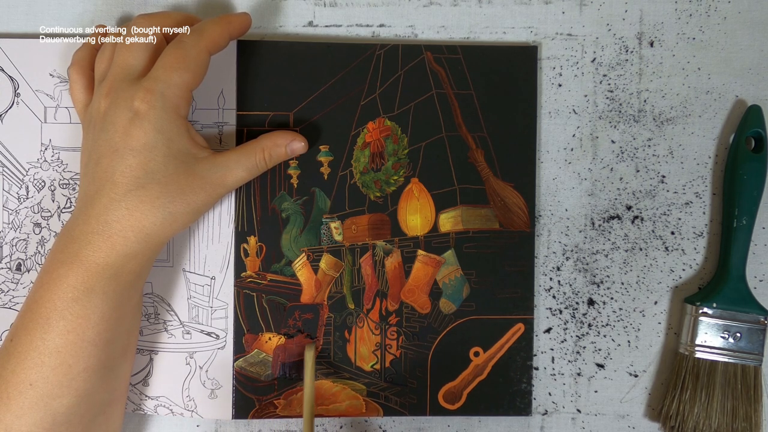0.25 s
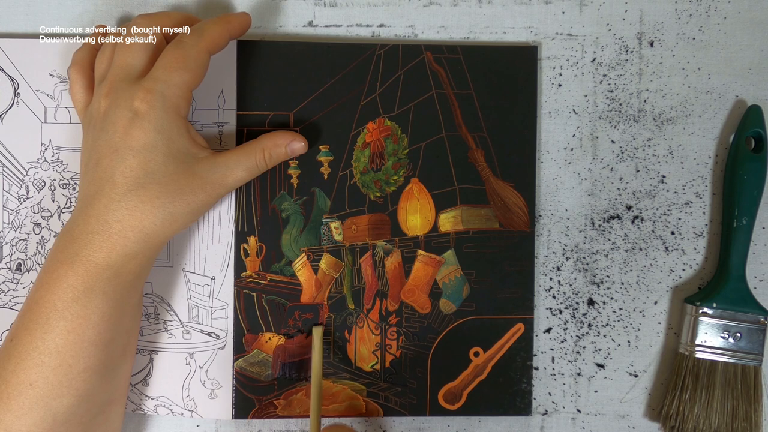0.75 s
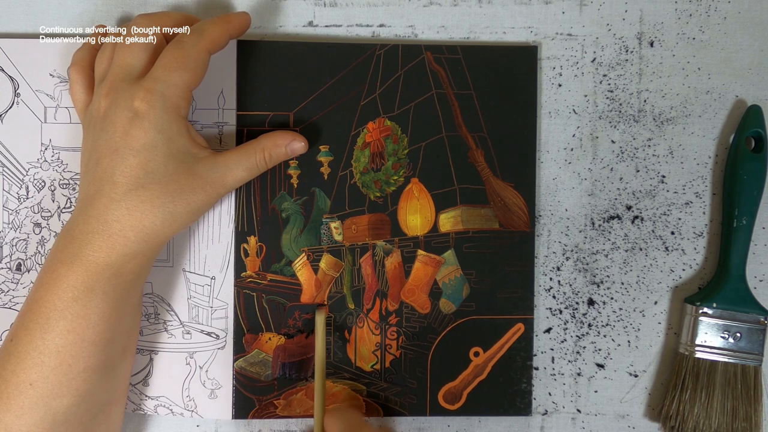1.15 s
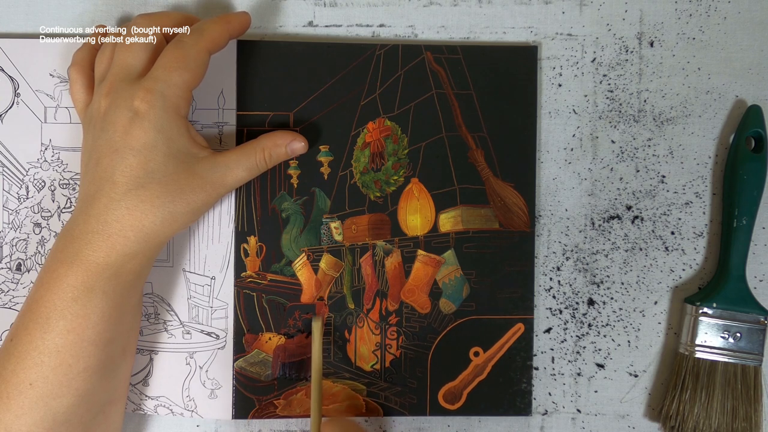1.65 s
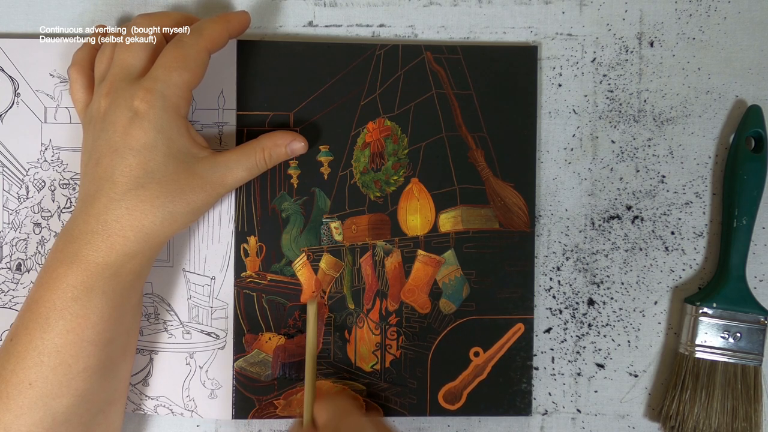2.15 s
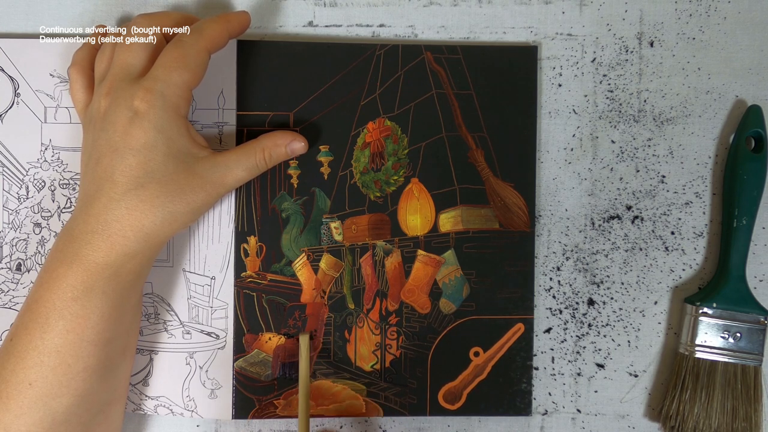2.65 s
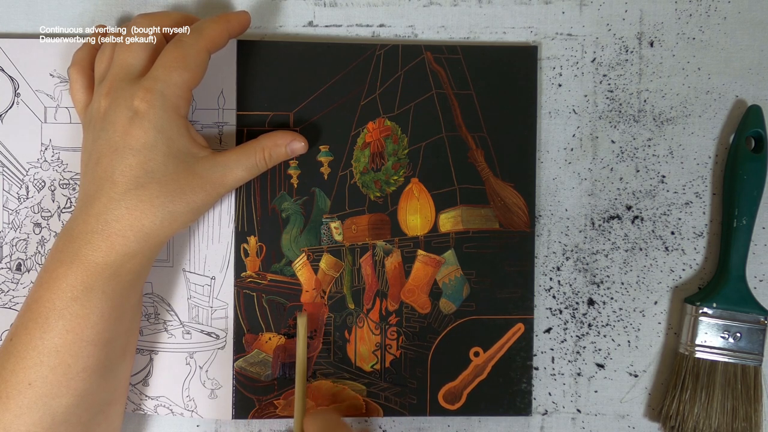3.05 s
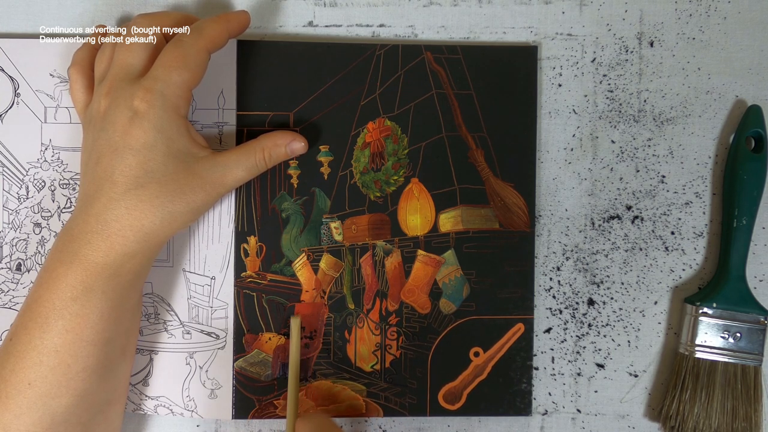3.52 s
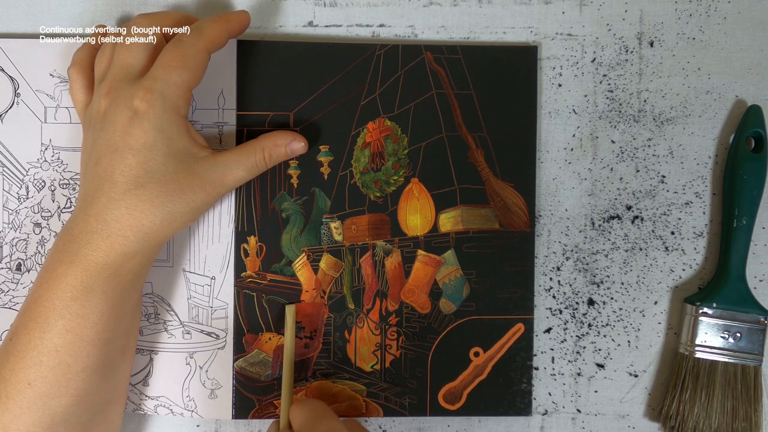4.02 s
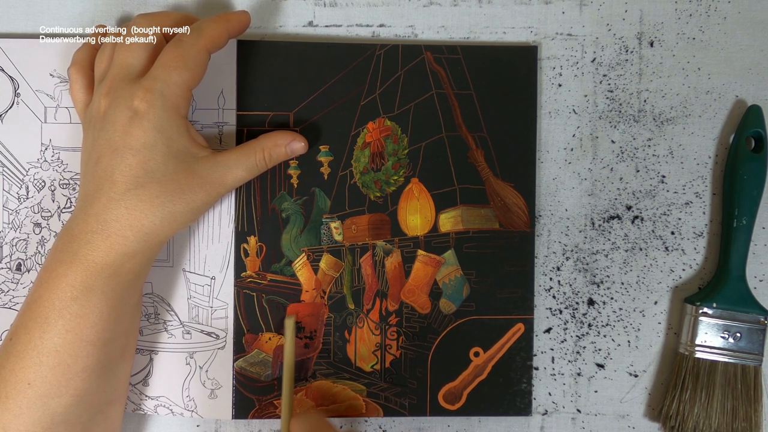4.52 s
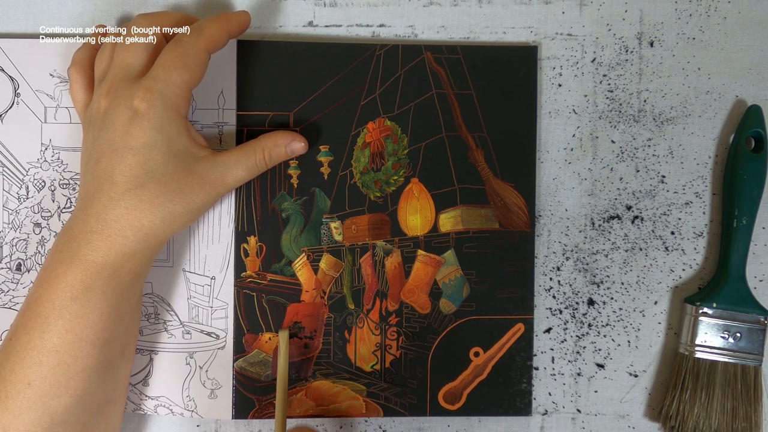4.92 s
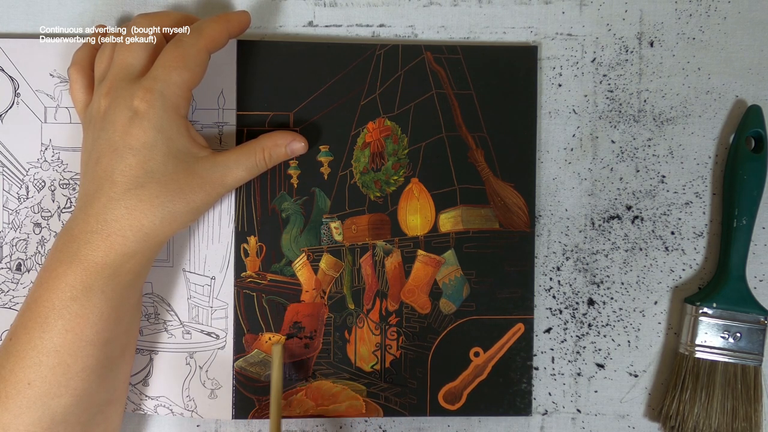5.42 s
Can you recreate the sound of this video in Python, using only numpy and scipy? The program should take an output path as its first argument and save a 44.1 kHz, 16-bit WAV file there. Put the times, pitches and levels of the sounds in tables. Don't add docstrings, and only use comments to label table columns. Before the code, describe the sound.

A wooden stylus scratches coated card on a table, heard close in a small quiet room. It opens mid-stroke with a hard push, catch and bump, then short uneven back-and-forth scrapes follow, several per second. Woody chatter, crisp flakes and dull table knocks colour them; later strokes turn dustier and lighter. A close stereo microphone also picks up slight low rumble and steady soft hiss.

```python
import sys
import numpy as np
from scipy import signal
from scipy.fft import rfft, irfft, next_fast_len
from scipy.io import wavfile
from scipy.ndimage import map_coordinates

SR = 44100
rng = np.random.default_rng(int(sys.argv[2]) if len(sys.argv) > 2 else 0)


def log_audio(samples):
    frames = np.atleast_2d(samples).T
    limited = np.clip(frames, -1, 1)
    pcm = np.round(limited * 32767).astype(np.int16)
    wavfile.write(sys.argv[1], SR, pcm)


def elevation(decibels):
    levels = np.asarray(decibels, float)
    return 10 ** (levels / 20)


N = 250047


def unit(x):
    return x / np.sqrt(np.mean(x ** 2) + 1e-20)


def along(points, hz):
    f, v = np.transpose(points)
    return np.interp(np.log(hz + 1), np.log(f + 1), v)


def over_time(points):
    return np.interp(np.arange(N) / SR, *np.transpose(points))


def wobble(knots_per_s):
    knots = rng.standard_normal(int(N * 400 / SR))
    return map_coordinates(knots, [np.arange(N) * knots_per_s / SR])


def filtered(x, response):
    m = next_fast_len(N + SR // 2)
    return irfft(rfft(x, m) * response(np.fft.rfftfreq(m, 1 / SR)), m)[..., :N]


def body(modes):
    def ring(f):
        total = 0
        for k, (hz, width_hz, db) in enumerate(modes):
            damping = 1j * f * width_hz
            total = total + (-1) ** k * elevation(db) * damping / (hz * hz - f * f + damping)
        return total
    return lambda f: ring(f) / np.sqrt(np.mean(np.abs(ring(f)) ** 2))


def skirted(modes, power):
    return lambda f: unit(np.abs(body(modes)(f)) ** power)


def colour(spectrum):
    return lambda f: unit(elevation(along(spectrum, f)))


# (time [s], run-out [s], pad level [dB], weight on the table [dB], tip speed [dB])
PUSHES = [(-0.035, 0.051, -39.5, -2, -2), (0.52, 0.042, -54, 6.5, 8.5), (0.734, 0.039, -41, 0.5, 0),
          (1.079, 0.077, -36.5, -6, -1.5), (1.905, 0.086, -45, -2.5, -2), (2.078, 0.067, -52, -11, 10),
          (2.244, 0.11, -40, -1.5, 1.5), (2.594, 0.13, -45, -5, 7), (2.772, 0.02, -38.5, -41, -0.5),
          (2.817, 0.0062, -43.5, -20, 1.5), (2.96, 0.1, -43.5, -5.5, 4), (3.098, 0.037, -48, -12, -2),
          (3.148, 0.015, -34.5, -3, -10), (3.17, 0.016, -42, -9.5, -1), (3.448, 0.02, -43.5, -29, -5.5),
          (3.537, 0.098, -44, -0.5, -5.5), (3.728, 0.036, -38.5, -29, -10.5), (4.117, 0.1, -57, 14.5, -2.5),
          (4.146, 0.085, -43, -31, -5), (4.472, 0.047, -45.5, -4.5, -7), (4.86, 0.069, -46.5, -18, -5),
          (4.98, 0.06, -65, 19.5, -6), (5.061, 0.026, -40, -25, -21), (5.527, 0.095, -42.5, -19, -9)]
# (time [s], build-up [s], pad level [dB], weight on the table [dB], tip speed [dB])
PULLS = [(0.054, 0.13, -54.5, -11, 1.5), (0.11, 0.054, -46, -13, -1.5), (0.24, 0.12, -36.5, -4, -1.5),
         (0.597, 0.1, -58, 1, 5), (0.706, 0.017, -48.5, 4.5, 9.5), (0.838, 0.042, -46, -10.5, -2.5),
         (1.413, 0.059, -37.5, -25, -5), (2.012, 0.042, -63, 5, 4.5), (2.064, 0.013, -51.5, -2, 13.5),
         (2.39, 0.068, -38, -10.5, 0.5), (2.715, 0.13, -51.5, -6, 6), (3.031, 0.091, -67.5, 20.5, -6),
         (3.229, 0.088, -41, -0.5, -2.5), (3.659, 0.11, -53, -4.5, -5.5), (3.822, 0.074, -44.5, -1, -3),
         (4.407, 0.063, -51, -1, -0.5), (4.988, 0.05, -43.5, -13, -2.5), (5.295, 0.074, -42, -32, -7.5)]
# (time [s], length [s], pad level [dB], weight on the table [dB], tip speed [dB])
GLIDES = [(0.34, 0.32, -66, 3, 0), (0.821, 0.17, -66, 0, 8), (0.984, 0.17, -58, 3, 3.5),
          (1.18, 0.16, -58, -15, -1.5), (1.344, 0.2, -54, 6.5, -0.5), (1.549, 0.13, -40, -9.5, -2),
          (1.689, 0.16, -56, -4, 2), (1.86, 0.17, -66, 3, 11), (2.137, 0.2, -70.5, -18, 7),
          (2.353, 0.25, -71.5, 9, 16.5), (2.502, 0.31, -57.5, -2, -1.5), (2.828, 0.15, -63, -20, -4),
          (2.894, 0.23, -79, 5, 15), (3.374, 0.19, -57.5, -0.5, -4.5), (3.536, 0.14, -55.5, -7, 6),
          (3.819, 0.17, -64, -3, 11), (3.964, .14, -58.5, -2, -5.5), (4.243, 0.16, -58.5, -4, -6),
          (4.532, 0.18, -59.5, -6, -5), (4.765, 0.19, -46, 3, -6), (5.029, 0.13, -64, 14.5, 9),
          (5.21, 0.15, -65, -0.5, -4.5), (5.368, 0.094, -64.5, -2, 7), (5.479, 0.2, -59.5, -2.5, 0.5)]
DIG_S, LET_GO_S, LET_GO_SHARE, GLIDE_RISE_SHARE = 0.025, 0.016, 0.2, 0.45
PULL_SCRATCH_DB, GLIDE_SCRATCH_DB = -2, 2


def strokes():
    rows = [(s, DIG_S, run_out, *db, 0) for s, run_out, *db in PUSHES]
    for s, build, *db in PULLS:
        rows.append((s, build, LET_GO_S + LET_GO_SHARE * build, *db, PULL_SCRATCH_DB))
    for s, length, *db in GLIDES:
        rise = GLIDE_RISE_SHARE * length
        rows.append((s, rise, length - rise, *db, GLIDE_SCRATCH_DB))
    return np.transpose(rows)


def swell(level_db, lag=0, tilt_db=0, edge=2):
    power = np.zeros(N)
    for s, rise, fall, db in zip(*strokes()[:3], level_db):
        start = s + lag
        at = np.arange(max(round(start * SR), 0), min(round((start + rise + fall) * SR), N))
        t = at / SR - start
        up = np.clip(t / rise, 0, 1)
        down = np.clip((t - rise) / fall, 0, 1)
        shape = (np.sin(up * np.pi / 2) * np.cos(down * np.pi / 2)).clip(0) ** edge
        power[at] += (elevation(db + tilt_db * t / (rise + fall)) * shape) ** 2
    return np.sqrt(power)


def slips(share, spread_db, clump_db):
    size = elevation(spread_db * rng.exponential(size=N).clip(0, 5)) * (rng.random(N) < share)
    return unit((size + 0.43) * rng.standard_normal(N) * elevation(clump_db * wobble(90)))


# (time [s], dust gain [dB], thud gain [dB], scratch gain [dB])
BARE = [
    (0.1, 4, 11, 8.5),
    (0.9, 2, -3, -1),
    (1.05, 6.5, 11, 0.5),
    (1.9, 4, 18.5, -0.5),
    (2.3, 12, -1, 0.5),
    (2.9, 12, 2.5, -2),
    (3.499, 6, 19.5, -1.5),
    (4.2, 21, 24, 3),
    (5.1, 19, 18, -0.1),
    (5.4, 6, 25, 1),
]


def bare(s):
    at, *gains_db = np.transpose(BARE)
    return [np.interp(s, at, db) for db in gains_db]


def bursts(rows, rise_s, fall_s, sink_per_s=5.4, rough_db=0):
    out, t = np.zeros(N + SR), np.arange(-SR // 40, SR // 12) / SR
    shape = np.where(t < 0, np.exp(-(t / rise_s) ** 2), 1 / np.cosh(t / fall_s))
    for (s, db, hz), turn in zip(rows, rng.random(len(rows))):
        cycles = hz * t * (1 - sink_per_s * t / 2) + turn
        out[round(s * SR):][:len(t)] += elevation(db) * shape * np.sin(2 * np.pi * cycles)
    return out[SR // 40:][:N] * elevation(rough_db * wobble(180))


# (time [s], peak level [dB], pitch [Hz])
SHOVES = [(0.0025, -45, 314), (0.0384, -45.5, 330), (0.3881, -33, 338), (0.43, -41.5, 321),
          (0.5607, -48.5, 465), (0.7867, -54, 353), (0.874, -39.5, 467), (1.1454, -41.5, 349),
          (1.4707, -42, 400), (1.969, -46.5, 353), (2.3192, -37, 358), (2.4609, -46.5, 355),
          (3.0141, -47.5, 395), (3.0451, -43, 345), (3.1843, -49, 372), (3.3254, -39.5, 414),
          (3.5714, -40.5, 400), (3.6088, -48, 368), (3.7605, -42.5, 410), (3.8622, -42.5, 460),
          (3.8807, -39.5, 410), (3.9111, -43, 346), (3.9385, -40, 335), (4.1595, -49, 374),
          (4.2144, -49, 355), (4.4499, -42.5, 483), (4.838, -48, 516), (4.8495, -38, 310),
          (4.8819, -44, 330), (5.0495, -37.5, 322), (5.0929, -43, 310), (5.3848, -45, 491),
          (5.5753, -40, 555)]


def shoves():
    return elevation(-3.5) * bursts(SHOVES, rise_s=0.016, fall_s=0.0086, sink_per_s=1.9, rough_db=4.0)


# (time [s], peak level [dB], pitch [Hz])
FLUTTERS = [(0.0035, -35, 1260), (0.1527, -37, 875), (0.1661, -45.5, 1260), (0.2903, -35, 1155),
            (0.3068, -35, 810), (0.3233, -53, 1270), (0.3592, -36, 1080), (0.3622, -41, 860),
            (0.3751, -31, 1184), (0.3816, -33, 1195), (0.5358, -49, 1230), (1.1299, -45, 1200),
            (1.4692, -39, 1250), (1.5704, -40, 1290), (1.5884, -44, 1230), (1.6078, -38, 1274),
            (1.6308, -38.5, 1260), (1.776, -48, 1010), (1.9341, -40.5, 1220), (1.9501, -42, 1260),
            (2.1032, -34, 797), (2.2798, -41, 1245), (2.2968, -44, 1260), (2.3073, -40, 1120),
            (2.3247, -47, 1044), (2.6066, -31.5, 1274), (2.649, -27.5, 973), (2.7887, -32.5, 900),
            (2.8301, -36, 1010), (2.9822, -31.5, 1110), (2.9862, -31, 860), (2.9942, -40, 1290),
            (3.0067, -47, 1130), (3.0266, -35, 800), (3.1593, -37, 1130), (3.1733, -38, 1210),
            (3.2915, -43, 1120), (3.6123, -42.5, 1270), (3.776, -39, 1293), (3.8752, -38, 900),
            (4.1765, -42, 1320), (5.5514, -40, 1176)]


def flutters():
    return elevation(-2.5) * bursts(FLUTTERS, rise_s=0.003, fall_s=0.0038)


# (time [s], peak level [dB], pitch [Hz])
CHATTERS = [(0.0055, -27, 738), (0.2978, -30.5, 705), (0.3337, -33, 780), (0.3402, -37, 1145),
            (0.3462, -26.5, 663), (0.3781, -30.5, 660), (0.7154, -34, 1207), (0.7568, -32, 726),
            (0.7698, -30.5, 740), (1.0945, -27.5, 1040), (1.1045, -33, 767), (1.1135, -34, 1210),
            (1.1165, -29.5, 760), (1.4502, -38, 725), (1.4707, -34, 787), (1.5929, -33.5, 655),
            (1.6049, -36, 666), (1.6323, -37.5, 640), (1.9266, -37, 890), (1.9391, -36.5, 724),
            (2.0758, -35.5, 890), (2.0997, -31, 1106), (2.2579, -30.5, 993), (2.2743, -23.5, 696),
            (2.3058, -32, 750), (2.3222, -29, 709), (2.4255, -35.5, 855), (2.4449, -31, 1125),
            (2.4499, -26.5, 769), (2.4639, -30.5, 775), (2.4664, -29.5, 1217), (2.6116, -33, 876),
            (2.623, -31.5, 696), (2.662, -25.5, 777), (2.7981, -26.5, 763), (2.8021, -32.5, 1232),
            (2.8371, -33, 670), (2.9967, -24, 752), (3.1658, -27, 691), (3.1798, -35, 680),
            (3.2835, -35, 597), (3.306, -36.5, 796), (3.4651, -36, 770), (3.4766, -34, 760),
            (3.5923, -36, 690), (3.7545, -30.5, 752), (3.8852, -36.5, 820), (3.9111, -42, 770),
            (4.181, -32, 618), (4.4614, -40.5, 630), (4.4938, -47, 715), (4.8171, -38.5, 623),
            (4.828, -40, 732), (4.8919, -45, 704), (5.0844, -32, 630), (5.3803, -33.5, 724),
            (5.5514, -31.5, 734)]


def chatters():
    return elevation(-2.5) * bursts(CHATTERS, rise_s=0.0048, fall_s=0.0041)


# (time [s], peak level [dB])
LANDINGS = [(0.0045, -24.5), (0.129, -32), (0.262, -20.5), (0.535, -23.5), (0.876, -27), (1.092, -30),
            (1.567, -25.5), (1.923, -36), (2.072, -52), (2.254, -17.5), (2.412, -24), (2.604, -22),
            (2.779, -42), (2.971, -23.5), (3.107, -24), (3.258, -26), (3.462, -32), (3.548, -28),
            (3.752, -27.5), (3.853, -27), (4.131, -30.5), (4.438, -36), (4.791, -41), (4.812, -24),
            (4.995, -36), (5.333, -28.5), (5.545, -27)]
LANDING_THUD_DB, SNAG_THUD_DB = -28.5, -26
CHATTER_TICK_DB = 6.5


def catches():
    push, thud, t = np.zeros(N + SR), np.zeros(N + SR), np.arange(SR // 50) / SR
    rows = [(s, db, LANDING_THUD_DB) for s, db in LANDINGS]
    rows += [(s, db + CHATTER_TICK_DB, SNAG_THUD_DB) for s, db, _ in CHATTERS]
    for s, db, thud_db in rows:
        start = round(s * SR) - 180
        at = slice(start, start + len(t))
        burst = unit(rng.standard_normal(len(t)) * np.exp(-t / 0.002))
        push[at] += elevation(db - 24.0) * burst
        thud[at] += elevation(db + thud_db + bare(s)[1] - 17.5) * burst
    return push[:N], thud[:N]


# (frequency [Hz], width [Hz], level [dB])
TABLE = [(258.5, 5.3, -2.5), (276.5, 4.8, -2), (326.9, 8, 5.5), (400.3, 16, 0.5), (470.2, 28.3, 2.5),
         (572.5, 42, -2)]
# (frequency [Hz], width [Hz], level [dB])
PAD = [(618, 34, -3.5), (663, 42.4, -1), (695.3, 49.5, -2), (732, 38.5, 3.5), (762.6, 64.2, -2),
       (845, 24, -4)]
# (frequency [Hz], width [Hz], level [dB])
STICK = [(915.2, 26.4, 1), (986, 60, -1.5), (1086, 42.6, 0), (1196, 86, 1), (1272.6, 64.3, 3),
         (1328.6, 74.3, -1.5), (1518, 26, -6), (1651, 52, -10.5), (1902, 106, -13.5), (2000, 120, -16)]


def scrape():
    pad_db, weight_db, speed_db = strokes()[3:-1]
    force = slips(share=0.03, spread_db=2.5, clump_db=2.0)
    push, thud = catches()
    pad_gain = swell(pad_db - 2.0, lag=-0.0092, tilt_db=1.0)
    table_gain = swell(pad_db + weight_db - 4.0, lag=0.013, tilt_db=0.5)
    stick_gain = swell(pad_db + speed_db - 2.0, lag=-0.0056)
    pad = filtered(pad_gain * force + push, body(PAD))
    table = filtered(table_gain * force + thud, body(TABLE))
    stick = filtered(stick_gain * force + elevation(-6.0) * push, body(STICK))
    return pad + table + stick + chatters() + shoves() + flutters()


# (time [s], peak level [dB], coarse part against it [dB])
CRACKS = [(0.0044, -61, 12), (0.2646, -57.5, 11), (0.32, -63, 15), (0.362, -59.5, 20), (0.531, -52.5, 3.5),
          (5.5413, -53.5, -4), (0.1467, -56, 4), (3.345, -58, 0), (2.4149, -56, 1), (2.435, -54, 2),
          (2.7851, -70, 3), (2.974, -58, -17), (3.1258, -65, 3), (3.5935, -56, -16), (5.573, -59.5, 10),
          (5.099, -74, 5), (1.221, -76, 4), (0.683, -60.5, 6), (0.712, -57, 6), (0.885, -57.5, 4.5),
          (1.0935, -53, 8.5), (1.4592, -62.5, 13), (1.4796, -51.5, 2.5), (1.566, -63, -5), (2.074, -69, 2),
          (2.0997, -53.5, 9.5), (2.254, -56, -9), (2.2817, -45, -1), (2.4649, -52, 11), (2.6058, -53, -20),
          (2.676, -50, -18), (2.805, -51, 1.5), (2.8433, -52.5, 5), (3.1946, -58, -3), (3.2897, -50, -10),
          (3.7758, -56, 2), (4.8866, -55, 1), (4.994, -70, 3), (5.5507, -59, -3), (5.3585, -63, 1),
          (5.388, -59, -1), (5.376, -63, 1.5), (5.5475, -55, 5.5), (5.5769, -54, 6)]
# (frequency [Hz], density [dB per Hz])
FLAKE = [(1500, -29), (3000, -25), (6000, 12), (10000, 9), (13500, -1), (15500, -13)]


def cracks():
    coarse, snap, t = np.zeros(N), np.zeros(N), np.arange(SR // 100) / SR - 0.003
    for s, db, coarse_db in CRACKS:
        start = round((s + t[0]) * SR)
        at = slice(start, start + len(t))
        coarse_shape = np.exp(-((t - 0.0015) / 0.0022) ** 2)
        snap_shape = np.exp(-((t - 0.0012) / 0.0018) ** 2)
        coarse[at] += elevation(db + coarse_db - 9.5) * unit(rng.standard_normal(len(t)) * coarse_shape)
        snap[at] += elevation(db - 13) * unit(rng.standard_normal(len(t)) * snap_shape)
    return coarse, filtered(snap, colour(FLAKE))


# (time [s], edge level [dB])
ANGLE = [(.03, -8), (.17, -1), (.34, -11), (.55, -3.5), (.74, -13), (.89, -1.5), (1.11, -20), (1.46, -25),
         (1.62, -4.5), (1.79, -30), (1.95, -3), (2.11, -25), (2.3, 2), (2.46, -26), (2.66, 4), (2.82, -27),
         (3.02, 7), (3.18, -28), (3.31, 10), (3.48, -30), (3.6, 7), (3.77, -20), (3.9, 9), (4.19, -7),
         (4.49, 4), (4.86, -1), (5.05, -31), (5.37, -2), (5.57, -5.5)]
# (frequency [Hz], width [Hz], level [dB])
EDGE = [(4150, 78, -1.5), (4450, 220, 1.9), (4890, 270, 1)]
# (frequency [Hz], width [Hz], level [dB])
FLANK = [(2400, 99, 6.5), (2860, 830, 0)]


def edge_and_flank(tear):
    edge_db = over_time(ANGLE)
    singing = filtered(elevation(-1.5 + edge_db) * tear, skirted(EDGE, 1.2))
    rasping = filtered(elevation(-16.5 - 0.58 * edge_db) * tear, skirted(FLANK, 1.2))
    return singing + rasping


# (frequency [Hz], density [dB per Hz])
COATING = [(1240, -11), (2100, -3), (2330, -20.5), (2960, -3), (3710, -2), (4000, -8.5), (4310, -18.5),
           (4930, -32), (5410, -21.5), (9160, -23), (9960, -37), (13900, -49), (15500, -66)]
# (frequency [Hz], width [Hz], level [dB])
DUST = [(1680, 140, 1.5), (2030, 150, -1), (3400, 280, 2), (4710, 200, -7.5), (5080, 160, -9.5),
        (6300, 1000, -14), (8420, 580, -10.5), (9270, 360, -9), (11800, 770, -22)]
# (frequency [Hz], density [dB per Hz])
SHEEN = [(4300, -33), (6000, 1.5), (9300, -1), (12400, -3), (13600, -11), (14600, -26)]
SCRATCH_DB, SCRATCH_PER_SPEED = -15.5, 0.97
DUST_DB, DUST_PER_DB = -7.5, -0.57
SHEEN_DB, SHEEN_PER_DB = -14, 0.68
SURFACE_EDGE, SHEEN_EDGE = 2.22, 0.75


def coating():
    start, _, _, pad_db, _, speed_db, kind_db = strokes()
    dust_gain_db, _, scratch_db = bare(start)
    surface_db = pad_db + SCRATCH_PER_SPEED * speed_db + SCRATCH_DB + kind_db + scratch_db
    dust_db = DUST_DB + DUST_PER_DB * (surface_db + 65) + dust_gain_db
    dusty = np.clip(elevation(dust_db) ** 2, 0.001, 0.97)
    sheen_db = -65 + SHEEN_PER_DB * (surface_db + 64.5) + SHEEN_DB

    tear = swell(surface_db + 10 * np.log10(1 - dusty), edge=SURFACE_EDGE)
    tear *= slips(share=0.25, spread_db=2.5, clump_db=4)
    dust = swell(surface_db - 0.7 + 10 * np.log10(dusty), edge=SURFACE_EDGE)
    dust *= slips(share=0.28, spread_db=3.5, clump_db=1.3)
    sheen = swell(sheen_db, tilt_db=2, edge=SHEEN_EDGE)
    sheen *= slips(share=0.32, spread_db=3.0, clump_db=5.0)
    coarse, snaps = cracks()
    tear += coarse

    hiss = filtered(tear, colour(COATING)) + filtered(dust, skirted(DUST, 0.89))
    return hiss + filtered(sheen, colour(SHEEN)) + snaps + edge_and_flank(tear)


# (time [s], peak level [dB])
SWAYS = [(0.0, -62), (0.36, -69), (1.12, -72), (1.25, -63.5), (1.83, -73), (2.28, -65), (2.43, -55.5),
         (2.56, -65), (2.75, -66.5), (3.16, -64), (3.52, -68), (3.68, -69), (4.313, -67), (4.45, -65),
         (4.86, -67), (5.32, -70), (5.67, -72)]


def sway_db():
    t, rise_db_per_s, fall_db_per_s, rest_db = np.arange(N) / SR, 112, 104, -77.5
    rocks = [db - np.maximum(rise_db_per_s * (s - t), fall_db_per_s * (t - s)) for s, db in SWAYS]
    return np.maximum(np.max(rocks, axis=0), rest_db)


# (time [s], peak level [dB], deep part against it [dB])
THUMPS = [(0.002, -47, 1), (0.356, -59.5, -3), (0.737, -69.5, -26), (1.127, -58.5, -20), (1.474, -60.5, 1),
          (2.059, -75, -12), (2.271, -54, -5), (2.454, -63, -21), (2.667, -67, -12), (2.978, -57.5, -3),
          (3.177, -62, -3), (3.483, -57.5, 2), (3.75, -68, -8), (4.2, -63, -17), (4.861, -73, -16),
          (5.057, -70, -19), (5.375, -59.5, -3), (5.557, -64.5, -18)]
# (frequency [Hz], width [Hz], level [dB])
BOOM = [(142.6, 7, 1.4), (174, 9.8, 0.41)]
# (frequency [Hz], width [Hz], level [dB])
DEEP = [(72.4, 12, 0)]


def shake():
    sway = elevation(sway_db() - 2.0) * filtered(rng.standard_normal((2, N)), body([(32, 4.8, 0)]))
    hum = elevation(-77 + 1.5 * wobble(9)) * rng.standard_normal((2, N))
    bump, deep, t = np.zeros(N + SR), np.zeros(N + SR), np.arange(SR // 12) / SR
    push = unit(t * np.exp(-t / 0.00097))
    for s, db, deep_db in THUMPS:
        bump[round(s * SR):][:len(t)] += elevation(db - 20.5) * push
        deep[round(s * SR):][:len(t)] += elevation(db + deep_db - 35.5) * push
    thumps = filtered(bump[:N], body(BOOM)) + filtered(deep[:N], body(DEEP))
    same, other = sway + filtered(hum, body(BOOM))
    return thumps + np.array([same + 0.22 * other, same - 0.22 * other])


# (frequency [Hz], density [dB per Hz])
AIR = [(35, -60), (60, -8), (81, -12), (237, 2.5), (1260, -20), (1920, -17.5), (2470, -20.5), (2980, -24.5),
       (6730, -30), (8290, -30), (13000, -38.5), (15600, -38.5)]
# (time [s], level [dB])
HUSH = [(0, -1), (1.4, -0.5), (2.3, 0), (3.2, 0.5), (3.55, -1), (4.3, -2.5), (4.97, -2), (5.12, -4.5),
        (5.27, -4), (5.45, -1.5), (5.67, -0.5)]


def air():
    a, b = filtered(rng.standard_normal((2, N)), colour(AIR))
    b = filtered(b, lambda f: 0.8 + 0.29 * f / (f + 1500))
    hush = elevation(-68) * np.array([a + b, a - b])
    whine_hz, whine_db = 9935, -89
    whine = elevation(whine_db + 2 * wobble(5)) * np.sin(2 * np.pi * whine_hz * np.arange(N) / SR)
    return elevation(over_time(HUSH)) * (hush + whine * [[0], [1]])


# (frequency [Hz], t60 [s])
ROOM = [(200, 0.13), (1000, 0.28), (4000, 0.17), (12000, 0.049)]


def room(x):
    out, hop = np.zeros((2, N + SR)), SR // 5
    for start in range(0, N, hop):
        hz, t, z = signal.stft(rng.standard_normal((2, SR // 3)), SR, nperseg=256)
        decay = elevation(-60 * t / along(ROOM, hz)[:, None])
        tail = signal.istft(z * decay, SR, nperseg=256)[1]
        tail = tail / np.linalg.norm(tail[0])
        wet = signal.fftconvolve(x[None, start:start + hop], tail, axes=1)
        out[:, start + 100:][:, :wet.shape[1]] += wet
    return out[:, :N]


# (frequency [Hz], share [0-1])
ALIKE = [(60, 1), (130, 0.55), (290, 0.99), (640, 0.99), (1410, 0.91), (3100, 0.83), (6820, 0.7),
         (15000, 0.33)]
# (frequency [Hz], difference [dB])
LEAN = [(60, 6), (110, -12), (200, -3), (380, 0), (700, 0.0), (1290, -0.5), (2380, 2), (4400, 2),
        (8120, 0.5), (15000, -3.5)]
# (frequency [Hz], lead [rad])
LEAD = [(100, -0.14), (1100, -0.19), (2670, -0.77), (4400, -0.49), (6200, -1.26), (12000, -1)]


def scene():
    near = scrape() + coating()

    def alike(f):
        return np.clip(along(ALIKE, f), 0.01, 0.99) ** 0.64

    def ports(f):
        left = elevation(along(LEAN, f) / 2) * np.exp(0.5j * along(LEAD, f))
        return left ** np.array([[1], [-1]])

    direct = filtered(near, lambda f: np.sqrt(alike(f)) * ports(f))
    reverb = filtered(room(near), lambda f: np.sqrt(1 - alike(f)) * np.abs(ports(f)))
    return direct + reverb + shake() + air()


def band_limit(x):
    return signal.sosfilt(signal.butter(12, 15730, fs=SR, output="sos"), x)


def record(dry):
    mix = filtered(dry, lambda f: 1 / (1 + (f / 15750) ** 40))
    return band_limit(mix)


dry = scene()
out = record(dry)
log_audio(out)
```